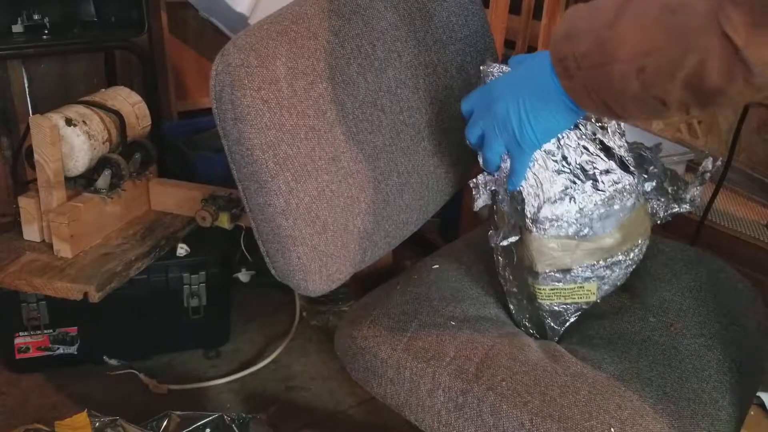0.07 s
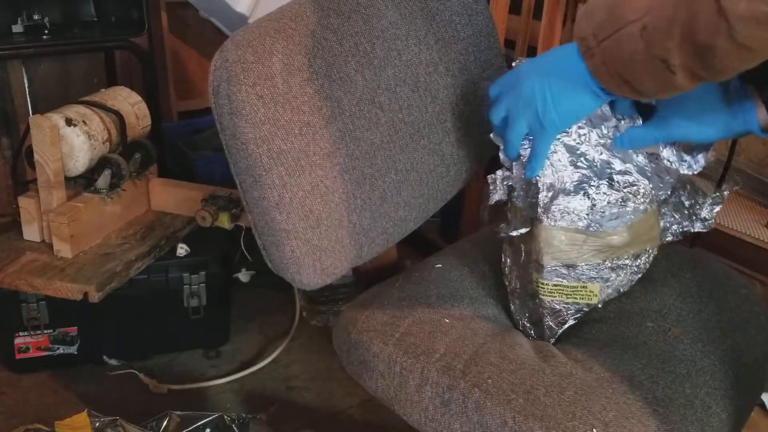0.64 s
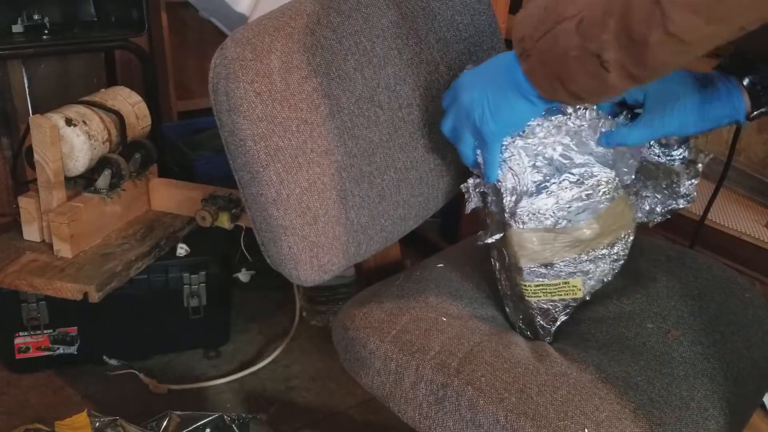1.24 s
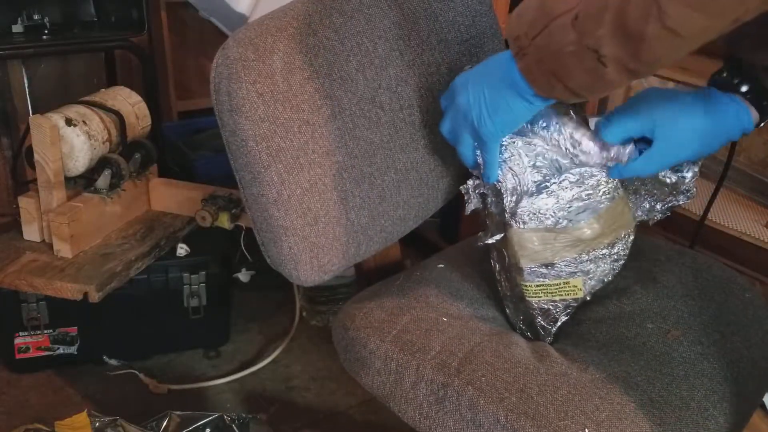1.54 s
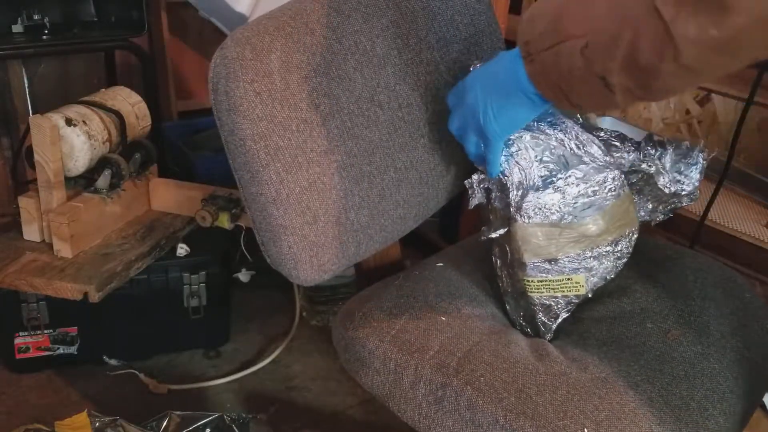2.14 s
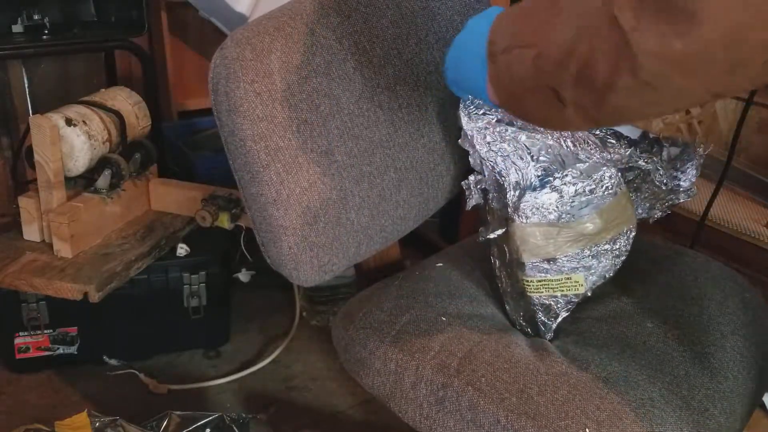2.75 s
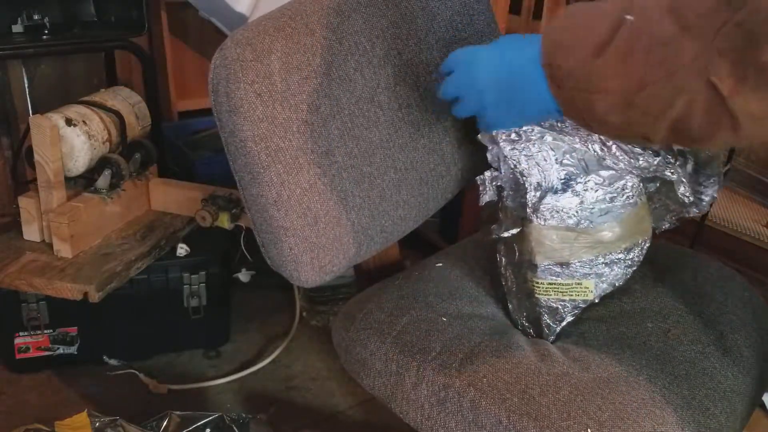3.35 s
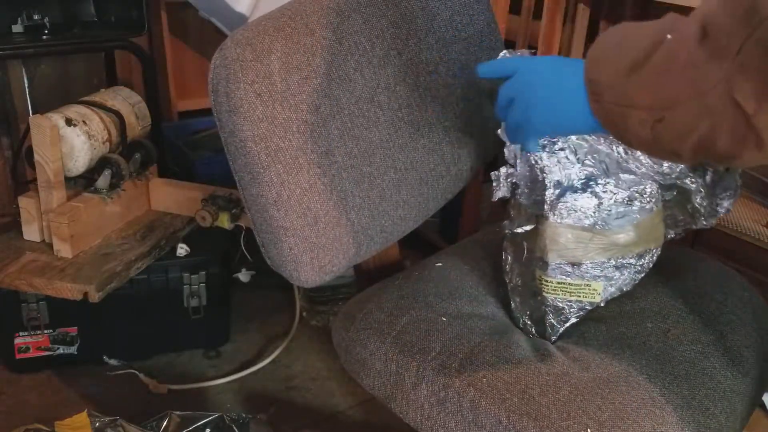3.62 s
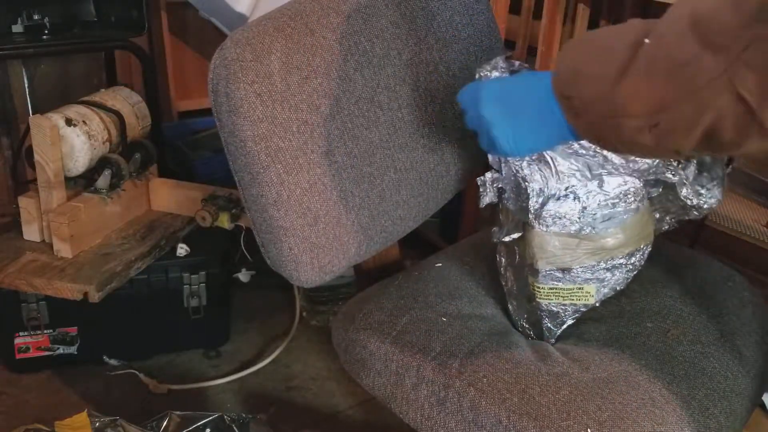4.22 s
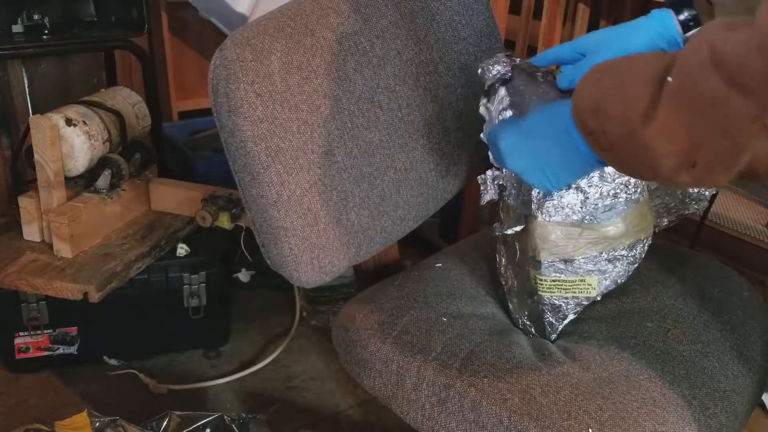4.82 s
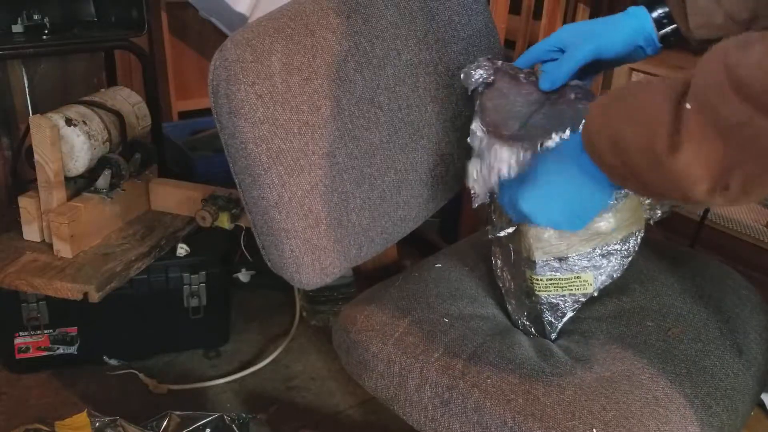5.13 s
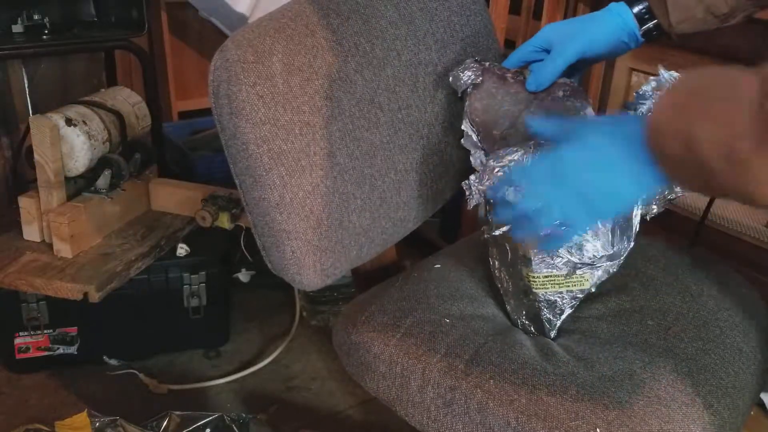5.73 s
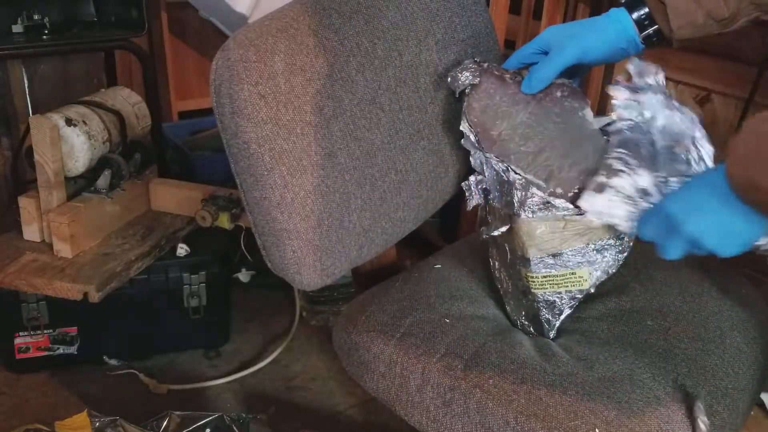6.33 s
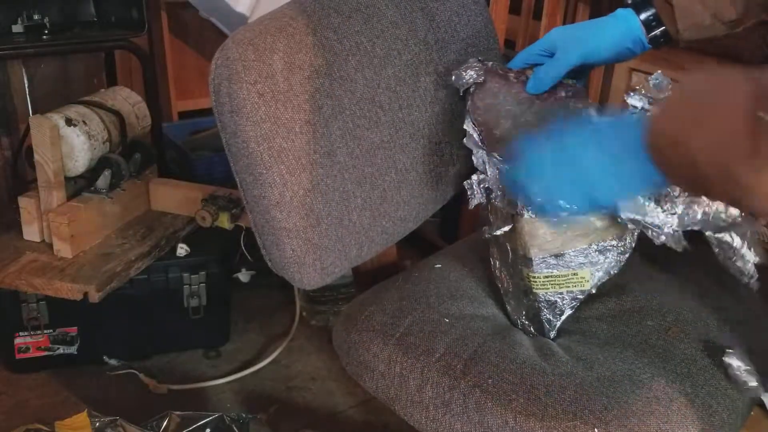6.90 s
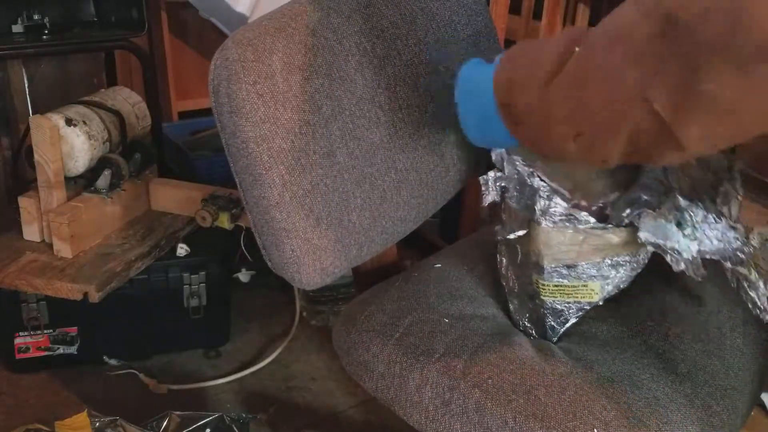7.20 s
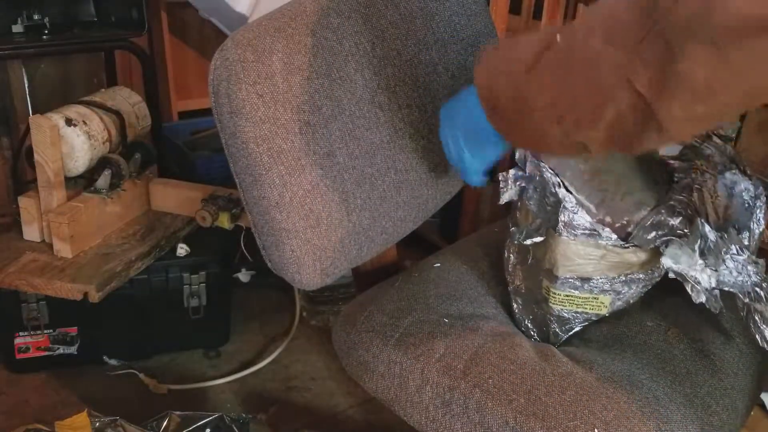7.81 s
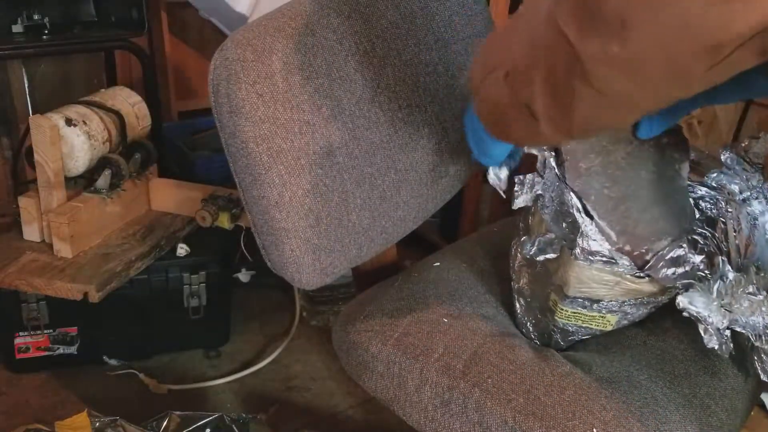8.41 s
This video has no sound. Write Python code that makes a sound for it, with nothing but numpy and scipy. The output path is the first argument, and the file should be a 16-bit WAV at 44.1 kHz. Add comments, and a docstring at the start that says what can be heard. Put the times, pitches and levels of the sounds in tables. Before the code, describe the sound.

Aluminium foil crackles and rustles in uneven spurts as it is pulled open by hand. Bright crinkling and small snaps start at once, thin out for a moment, then return with sudden crunches. A stronger stretch of pulling brings the loudest cracks, followed by more scattered crinkles. Two nearby microphones pick it up in a small room with a very faint hum behind it.

```python
"""Dense runs of tiny clicks, with louder snaps: gloved hands peel crumpled aluminium foil off an object
on a chair in a small workshop. Each click is a facet of foil buckling, each snap a crease giving way,
and taut spots ring when flicked or dragged. Now and then the bundle bumps the padded seat.
Two spaced microphones, the right one a little nearer the foil, hear it with the room's short ring,
over still air and mains hum."""
import sys
import numpy as np
from scipy import signal
from scipy.fft import rfft, irfft
from scipy.io import wavfile
from scipy.ndimage import uniform_filter1d

SR = 44100
rng = np.random.default_rng(int(sys.argv[2]) if len(sys.argv) > 2 else 0)


def unload_wav(signal):
    """Save mono or channel-first audio to the path in sys.argv[1] as 16-bit WAV at rate SR, clipped to [-1, 1]."""
    wavfile.write(
        sys.argv[1],
        SR,
        np.round(np.clip(np.atleast_2d(signal).T, -1, 1) * 32767).astype(np.int16),
    )


N = 381906
TIME = np.arange(N) / SR

# a pocket of foil collapses under a finger: t/s, effort/dB, small creases/dB, folds/dB
# (the last two relative to the finest wrinkles)
CRUNCHES = [(0.069, -33, -29, -13.5), (0.486, -34.5, -4, -9), (0.77, -32, -9.5, -7), (0.98, -35, 5, 4.5),
            (1.462, -36, 5, 2), (1.59, -31, -6, -5), (1.791, -32.5, -4.5, -7.5), (2.444, -39.5, -10, -28),
            (3.077, -22.5, -7, -6), (3.762, -35, 4, -0.5), (5.057, -33.5, -15, -6.5),
            (5.133, -24.5, -3.5, -10), (5.244, -23.5, -13, -9), (5.835, -43.5, -7.5, -15),
            (7.145, -38, -14, -28.5), (7.298, -27.5, -7.5, -11.5), (8.146, -26, -11.5, -9)]


def crinkle():
    """Fine wrinkles fizz, taut spots ping, creases tick, folds crackle and panels flap, in shared spurts."""
    wrinkles, creases, folds = handling() + 10 * np.log10(avalanches())
    fizz = facets(wrinkles + 0.93, 3900, 15700, per_s=2400, cycles=0.97, spread_db=2.8, count=20)
    pings = facets(wrinkles - 9.5, 5600, 15000, per_s=340, cycles=10, spread_db=4, count=28, bout_db=3)
    ticks = facets(creases - 0.76, 1950, 4400, per_s=620, cycles=2.3, spread_db=2.6, count=20, bout_db=4)
    crackle = facets(folds - 3.07, 640, 1950, per_s=600, cycles=1.9, spread_db=3, count=14, bout_db=2)
    # broad panels move with the folds that border them
    flaps = facets(folds - 6.5, 248, 648, per_s=440, cycles=1.82, spread_db=0.5, count=8)
    return fizz + pings + ticks + crackle + flaps


def facets(level_db, lo_hz, hi_hz, per_s, cycles, spread_db, count, bout_db=1.0, bout_s=.025):
    """A family of facets on four patches of foil: effort flips them more often and more loudly."""
    power = amp(level_db) ** 2
    chance = np.minimum(per_s / count / SR * np.sqrt(power / power.mean()), 1)
    patches = np.zeros((4, 2, N))
    for k, hz in enumerate(np.linspace(np.sqrt(lo_hz), np.sqrt(hi_hz), count) ** 2):
        flips = np.flatnonzero(rng.random(N) < chance)
        sizes = amp(spread_db * np.minimum(rng.exponential(size=8192), 3.02))  # many small, a few large
        sizes *= np.sign(rng.standard_normal(len(sizes)))
        # each facet is taut for a moment, then slack
        bouts = amp(bout_db * np.minimum(rng.standard_normal(len(sizes)), 2))
        taut = bouts[(TIME[flips] / bout_s + rng.random()).astype(int)] / np.sqrt(np.mean(bouts ** 2))
        strength = np.sqrt(power[flips] / chance[flips] / count)
        clicks = np.zeros(N)
        clicks[flips] = taut * sizes[flips % len(sizes)] / sizes.std() * strength
        patches[k % len(patches)] += convolve(clicks, buckle(hz, cycles))
    return patches


def buckle(hz, cycles, skew=0.72, pan_db=-4.0, beam_hz=5000, size=1024):
    """One facet flips: a few cycles of ringing that reach the right microphone first."""
    place, side, twist = np.clip(rng.standard_normal(3), -1, 1)
    beaming = np.tanh(hz / beam_hz)  # short waves leave the crumpled sheet unevenly
    mics = np.array([[1], [-1]])
    lag_s = .00007 + .00003 * place
    turns = np.maximum(np.arange(size) / SR - np.maximum(mics * lag_s, 0), 0) * hz
    phase = 2 * np.pi * turns + mics * skew * beaming * twist
    motion = turns * np.exp(-2 * turns / cycles) * np.sin(phase)
    # a small facet radiates only as its speed changes, so it has no bass of its own
    return unit(np.diff(motion, prepend=0) * amp(mics * pan_db * beaming * side))


def handling(rest_db=-78):
    """Gradual pulls and sudden crunches add up to the levels of fine wrinkles, small creases and folds."""
    # the hands drag the foil, grip by grip: t/s, length/s, mid-pull effort/dB, swell over the pull/dB,
    # small creases/dB, folds/dB (the last two relative to the finest wrinkles)
    pulls = [(-0.02, 0.24, -39.5, -3.5, -2.5, -1.5), (0.175, 0.34, -37.5, -5.5, -1, -7.5),
             (0.456, 0.22, -39.5, 2, -4, -8), (0.7, 0.57, -41, -1.5, -2, -14.5),
             (0.977, 0.125, -36, -0.5, -2.5, -2.5), (1.125, 0.07, -37, -1.5, -4.5, -1),
             (1.252, 0.078, -30.5, 5, -3.5, -2.5), (1.36, 0.43, -42.5, -11.5, -7, -10.5),
             (1.795, 0.24, -43, -5.5, -9.5, -11.5), (2.154, 0.12, -50.5, -4, -11, -4.5),
             (2.399, 0.085, -51.5, 17, -11, -8.5), (2.558, 0.37, -44, -2.5, -1.5, -6),
             (2.914, 0.035, -28.5, -1, -1, -5.5), (3.245, 0.23, -50, -15.5, -4.5, -9.5),
             (3.527, 0.13, -48.5, -5, -2, -2.5), (3.678, 0.11, -40, 6, -8, -5.5),
             (3.871, 0.33, -36, 3.5, 0.5, -7.5), (4.133, 0.03, -25.5, 7, -2, -10),
             (4.292, 0.15, -48.5, 14.5, -1.5, -9.5), (4.537, 0.12, -46, -1, -4, -6.5),
             (4.681, 0.25, -35.5, -1.5, -8, -12.5), (4.877, 0.077, -30, -3, -5.5, -6),
             (5.063, 0.24, -34.5, -4, -2.5, -9.5), (5.239, 0.074, -19, -2.5, -4.5, -7),
             (5.309, 0.091, -28, 1, -2, -1.5), (5.513, 0.13, -39, -7, -5.5, -4.5),
             (5.834, 0.06, -38.5, 7, -2, -6), (5.913, 0.47, -31.0, 5.5, -5, -5),
             (6.502, 0.3, -36.5, 5, -9.5, -4), (6.804, 0.03, -21, 0, -13, -5),
             (6.853, 0.12, -38.5, -0.5, -11, -8.5), (7.131, 0.11, -45, 5.5, -2.5, -13),
             (7.378, 0.23, -39, -2, -5, -9.5), (7.646, 0.11, -43.5, 14.5, -9.5, -13),
             (7.955, 0.17, -40, 7, -10.5, -8), (8.251, 0.14, -37.5, 3, -6.5, -10.5),
             (8.446, 0.47, -45.5, -6.5, -7.5, -9.5)]
    moves = [(strain(s, length, db, swell, attack_s=.015), mix) for s, length, db, swell, *mix in pulls]
    moves += [(strain(s, 0, db, 0, attack_s=.0025), mix) for s, db, *mix in CRUNCHES]
    power = amp(rest_db) ** 2 + sum(np.outer(amp([0, *mix]) ** 2, move) for move, mix in moves)
    return np.array([np.interp(TIME, TIME[::16], 10 * np.log10(p)) for p in power])


def strain(start, length, db, swell_db, attack_s, settle_db_per_s=242.5):
    """Power of one movement, every 16th sample: it builds, swells or slackens, then the foil settles."""
    age = np.maximum(TIME[::16] - start, 0)
    hold_db = swell_db * (np.minimum(age / max(length, 1e-6), 1) - .5)
    release_db = settle_db_per_s * np.maximum(age - length, 0)
    return (np.minimum(age / attack_s, 1) * amp(db + hold_db - release_db)) ** 2


def avalanches(per_s=70, decay_s=0.0035, spread_db=4.0, steady=.18):
    """One flip sets off its neighbours: spurts of power that start at once and die away."""
    kicks = (rng.random(N) < per_s / SR) * amp(spread_db * np.minimum(rng.exponential(1, N), 2)) ** 2
    kicks[[round(s * SR) for s, *_ in CRUNCHES]] += amp(spread_db) ** 2  # each crunch begins with one
    spurts = signal.lfilter([1], [1, -np.exp(-1 / (decay_s * SR))], kicks)
    power = steady + spurts / spurts.mean()
    return power / uniform_filter1d(power, size=4000)


def snaps(gain_db=-1.5, fall_db_per_octave=4.0, run_s=.0005, lead_hz=5000):
    """A crease gives way: one facet leads, the larger the stronger; others follow in a millisecond or so."""
    # creases that snap through: t/s, level/dB, f/Hz
    creases = [(0.0704, -18, 2820), (0.227, -20.5, 1660), (0.49, -21.5, 2210), (0.572, -28.5, 1330),
               (0.725, -28, 1350), (0.773, -17.5, 1730), (1.2028, -32, 1040), (1.264, -15.5, 9100),
               (1.278, -18.5, 1680), (1.4315, -13.5, 4300), (1.466, -14.5, 7400), (1.594, -15, 3470),
               (1.7914, -22, 3200), (2.029, -27, 1400), (2.8358, -26.5, 2740), (3.072, -15.5, 6000),
               (3.7586, -19.5, 1710), (4.6931, -23.5, 4050), (5.2338, -17, 1500), (5.244, -13, 1860),
               (5.3232, -4, 1500), (5.3404, -10, 1700), (5.443, -23, 1930), (5.458, -7.5, 10000),
               (5.6186, -22, 12000), (6.0068, -19.5, 1400), (6.368, -14, 2140), (6.5767, -16, 9900),
               (6.6825, -24, 1590), (7.296, -22, 5500), (7.463, -24, 11700), (7.5658, -19, 2530),
               (7.653, -26.5, 860), (8.116, -24.5, 900), (8.148, -18, 1870), (8.174, -23, 2060),
               (8.277, -26, 1660)]
    out = np.zeros((2, N))
    for s, db, hz in creases:
        lead = unit(buckle(hz, cycles=1, skew=0) + buckle(2 * hz, cycles=.5, skew=0))
        crack = np.zeros_like(lead)
        for f in np.geomspace(500, 14000, 16):
            gain = amp(-fall_db_per_octave * abs(np.log2(f / hz)))
            add(crack, rng.exponential(run_s), gain * buckle(f, cycles=1))
        snap = unit(unit(crack) + np.tanh(lead_hz / hz) * lead)
        add(out, s, amp(db + gain_db) * np.sqrt(SR / 1000) * snap)  # one millisecond's worth of energy
    return out


def panel_rings():
    """A stiff panel or taut spot of foil rings when it is flicked or dragged."""
    # flicks and drags on the foil: t/s, length/s, level/dB, f/Hz, ringing/cycles
    flicks = [(0.222, 0.179, -37, 660, 1.07), (0.632, 0.032, -40.5, 2980, 40),
              (1.2035, 0.017, -26, 636, 0.82), (1.507, 0.018, -35, 2960, 18),
              (3.8866, 0.001, -16, 3100, 1.2), (3.9826, 0.00092, -13, 3280, 2),
              (5.29, 0.036, -31, 305, 4.5), (6.165, 0.014, -28, 10300, 3.5),
              (6.9604, 0.0025, -21, 11700, 3.5)]
    return drags(flicks)


def seat_bumps():
    """Hand and bundle bump and rumble on the padded chair."""
    # contacts with the seat: t/s, length/s, level/dB, f/Hz, ringing/cycles
    bumps = [(2.03, 0.22, -58.5, 190, 0.79), (6.07, 0.26, -55, 88.5, 0.52), (6.82, 0.093, -51, 160, 1.2)]
    return drags(bumps)


def drags(contacts, slips_per_s=900, catch=3):
    """A surface catches once, and quick little slips keep it sounding at its own pitch."""
    out = np.zeros((2, N))
    for s, length, db, hz, cycles in contacts:
        slips = (rng.standard_normal(N) * (rng.random(N) < slips_per_s / SR))[:int(length * SR)]
        slips *= signal.windows.tukey(len(slips))
        force = slips + catch * signal.unit_impulse(len(slips))
        ring = convolve(force, buckle(hz, cycles, skew=0, size=4096))
        add(out, s, amp(db) * np.sqrt(len(slips)) * unit(ring))
    return out


def workshop(x, wet_db, echo_db=0, build_s=0.0059, mono_hz=700, scatter=0.13, size=20000):
    """Direct sound, a near reflection and a diffuse tail whose bass is alike at both microphones."""
    # bounce off a nearby surface: delay/s, level/dB
    echoes = [(.0066, -8.5)]
    # the room's ring: f/Hz, time to fall 60 dB/s
    ring_times = [(200, 0.13), (1000, 0.27), (16000, 0.15)]
    t = np.arange(size) / SR
    hz, s, noise = signal.stft(rng.standard_normal((2, size)), SR)
    alike = 1 / (1 + (hz[:, None] / mono_hz) ** 2)
    noise[1] = alike * noise[0] + np.sqrt(1 - alike ** 2) * noise[1]
    decay = np.exp(-np.log(1000) * s / read(ring_times, hz)[:, None])
    tail = signal.istft(noise * decay, SR)[1][:, :size]
    response = amp(wet_db) * unit(tail * (1 - np.exp(-(t / build_s) ** 2)))
    response[:, 0] += 1  # direct path
    for delay, db in echoes:
        arrival = delay * (1 + scatter * rng.uniform(-0.99, 1)) * SR + rng.uniform(0, 7, 2)
        response[[0, 1], arrival.astype(int)] += amp(db + echo_db)
    return convolve(x, unit(response))


def spaced_pair(foil):
    """The two microphones share one colour, but each favours different bands of the treble."""
    # colour of foil and microphones together: f/Hz, level/dB
    colour = [(35, -5), (90, 10.5), (160, 9), (230, -2.5), (600, -5), (1500, 2), (3000, 0), (5500, -2.5),
              (8500, -2), (10500, -0.5), (16000, 1.5)]
    # the left microphone's lead: f/Hz, half the left-right level difference/dB
    left_lead = [(5300, 0.75), (7500, 5.5), (9200, -3), (12500, -0.9), (15000, -0.2)]
    right_lead = [(hz, -db) for hz, db in left_lead]
    left, right = tint(foil, colour)
    return np.vstack([tint(left, left_lead), tint(right, right_lead)])


def room_tone(air_db=-61.0, width=0.31, hum_hz=120, hum_db=-64.5):
    """Low room noise, nearly the same at both microphones, and mains hum."""
    # still air of the workshop: f/Hz, relative level/dB
    air_spectrum = [(20, -8), (110, 4.5), (200, -8), (1500, -26), (16000, -20.5)]
    shape = amp(read(air_spectrum, np.fft.rfftfreq(N, 1 / SR)))
    common, side = irfft(rfft(rng.standard_normal((2, N))) * shape, N)
    air = amp(air_db) * np.sqrt(N) * unit(np.array([common + width * side, common - width * side]))
    hum = amp(hum_db) * np.sqrt(2) * np.sin(2 * np.pi * hum_hz * TIME)
    return air + hum


def amp(db):
    """Decibels to gain."""
    return 10 ** (np.asarray(db) / 20)


def read(points, hz):
    """A table's value at hz, joined on a log-frequency axis."""
    f, value = np.transpose(points)
    return np.interp(np.log(hz + 1), np.log(f + 1), value)


def unit(x):
    """Scales a sound to a mean energy of one per channel."""
    return x / np.sqrt(np.sum(x ** 2) / len(x) + 1e-20)


def add(mix, s, sound):
    """Mixes a sound in at time s."""
    part = mix[:, max(round(s * SR), 0):][:, :sound.shape[1]]
    part += sound[:, :part.shape[1]]


def convolve(x, response):
    """Passes each channel through a response."""
    return signal.oaconvolve(np.atleast_2d(x), np.atleast_2d(response), axes=1)[:, :N]


def tint(x, points, size=2048):
    """Minimum-phase filter with the given spectrum, so that clicks keep their sharp fronts."""
    log_gain = np.log(amp(read(points, abs(np.fft.fftfreq(size, 1 / SR)))))
    response = np.fft.ifft(np.exp(np.conj(signal.hilbert(log_gain)))).real
    return convolve(x, response)


def scene():
    """Each patch of foil meets the room from its own place; snaps and rings sound drier and closer."""
    foil = sum(workshop(patch, wet_db=1.6) for patch in crinkle())
    foil += workshop(snaps() + panel_rings(), wet_db=-5.5, echo_db=-9.0)
    return spaced_pair(foil) + seat_bumps() + room_tone()


def record(dry, ceiling=.75, edge_hz=16050):
    """The loudest snaps overload the microphones softly, and the top of the treble is cut off."""
    rounded = ceiling * np.tanh(dry / ceiling)
    low_pass = signal.firwin(401, edge_hz, window=("kaiser", 8), fs=SR)
    return signal.oaconvolve(rounded, low_pass[None], "same")


dry = scene()
out = record(dry)
unload_wav(out)
```